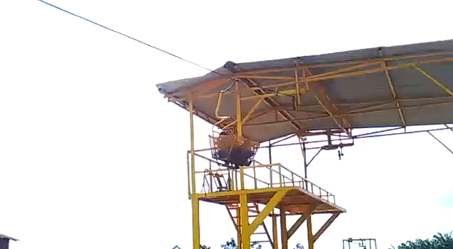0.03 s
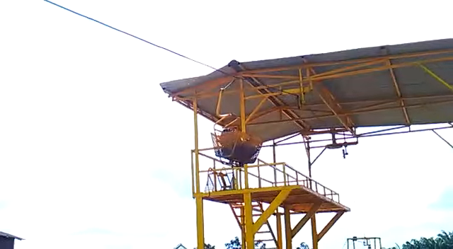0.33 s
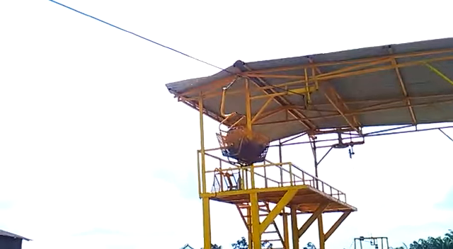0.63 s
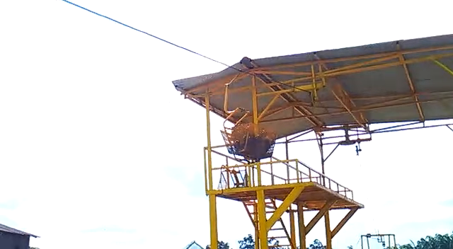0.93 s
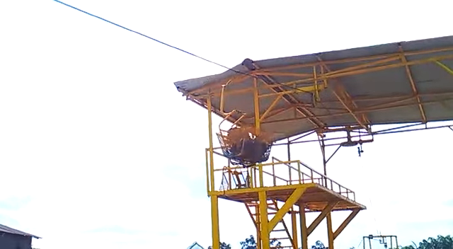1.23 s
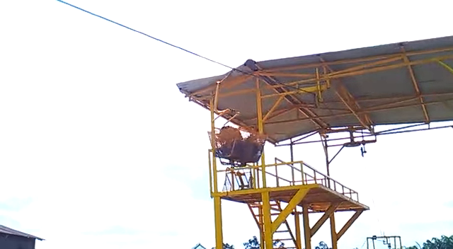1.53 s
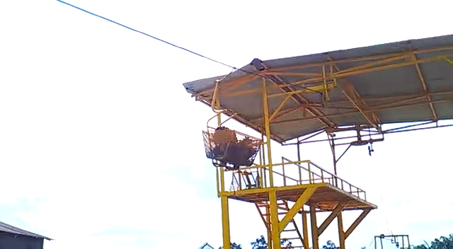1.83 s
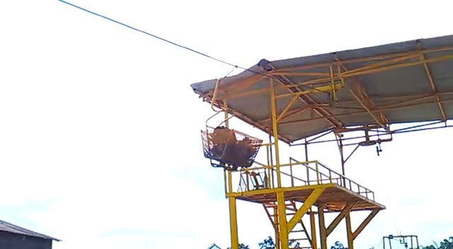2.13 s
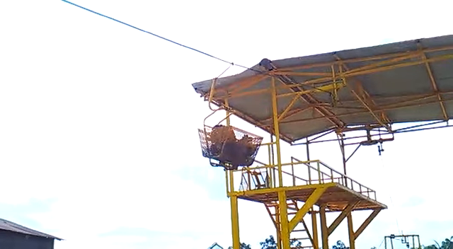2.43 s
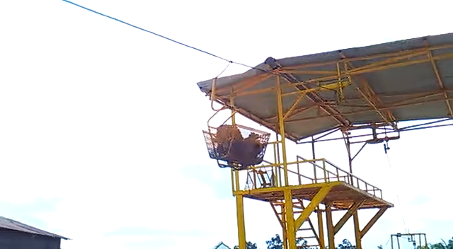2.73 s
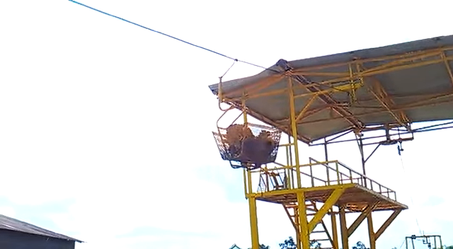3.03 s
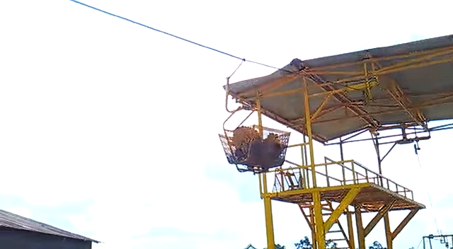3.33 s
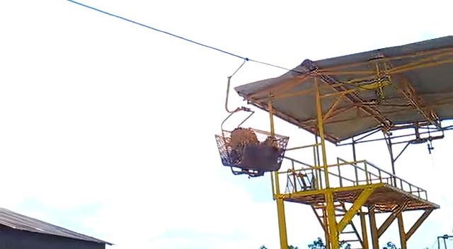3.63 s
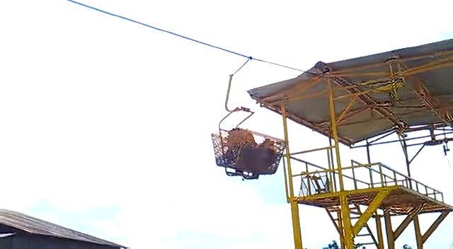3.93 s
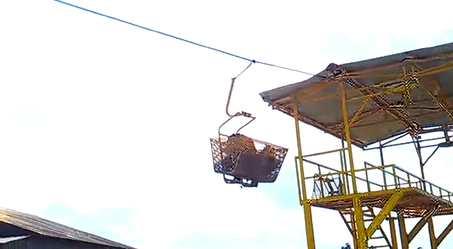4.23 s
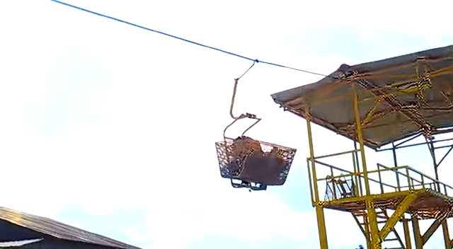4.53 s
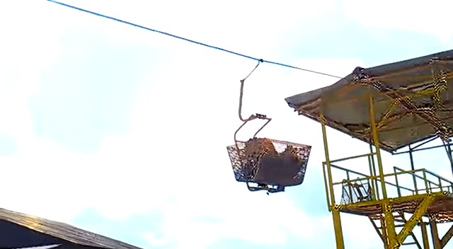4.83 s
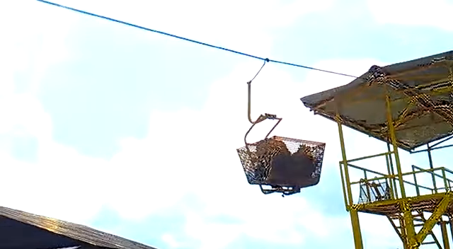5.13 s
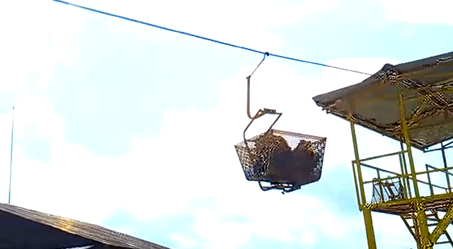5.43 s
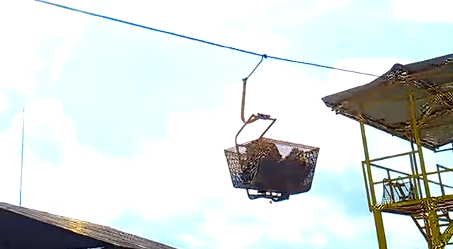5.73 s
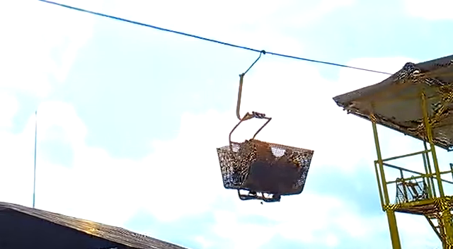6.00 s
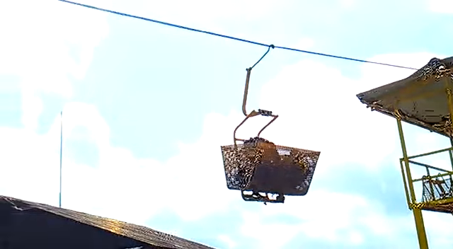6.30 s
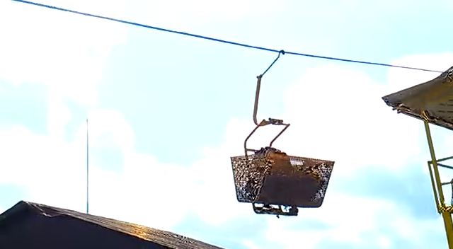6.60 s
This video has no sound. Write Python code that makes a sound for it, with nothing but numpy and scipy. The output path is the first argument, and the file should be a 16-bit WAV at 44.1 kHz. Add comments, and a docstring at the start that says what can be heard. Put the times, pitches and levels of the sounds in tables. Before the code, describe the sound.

A diesel engine drones and clatters at a goods cableway while the cable rumbles and squeaks over pulleys and cicadas shrill.

```python
"""Close beside the tin-roofed station of a goods cableway, the microphone turning after a loaded basket.
The sound cuts in at 0.6 s: a diesel drive at steady speed drones, knocks and clatters straight ahead,
the rope rumbles, rasps and squeaks over the sheaves, and cicadas shrill in the open country around.
The steel frame thuds now and then, and fainter insects call. From about 3 s a loose plate rings in
bouts and a few puffs of wind bump the microphone."""
import sys
import numpy as np
from scipy import signal
from scipy.fft import rfft, irfft, next_fast_len
from scipy.io import wavfile

SR = 44100
rng = np.random.default_rng(int(sys.argv[2]) if len(sys.argv) > 2 else 0)


def generate_wav(signal):
    """Clip the signal to [-1, 1] and save it as 16-bit WAV at the path in sys.argv[1]."""
    frames = np.transpose(np.atleast_2d(signal))
    scaled = np.clip(frames, -1, 1) * 32767
    pcm = np.round(scaled).astype(np.int16)
    wavfile.write(sys.argv[1], SR, pcm)


N = 302526
TIME = np.arange(N) / SR
CYCLES_PER_S = 12.581   # four-stroke cycles of the governed engine

# the four uneven exhaust beats: place_in_cycle (0-1), relative_db
EXHAUST_BEATS = [(.072, 6), (0.36, -4.5), (0.58, -0.5), (.872, -1.5)]
# rise and fall of the exhaust: time_s, gain_db
EXHAUST_LEVEL = [(.6, -4), (1.3, -0.5), (1.85, -2.5), (2.2, -6.5), (2.7, 1), (3.3, -3.5), (4.4, -1),
                 (4.9, -5.5), (5.5, -1), (6.85, 0.5)]


def from_db(db):
    """Decibels to gain."""
    return 10 ** (np.asarray(db) / 20)


def rms_one(x):
    """Scale to unit power."""
    return x / np.sqrt(np.mean(x ** 2) + 1e-20)


def in_time(curve):
    """A curve of (time_s, value) points, read at every sample."""
    return np.interp(TIME, *np.transpose(curve))


def drift(rate_hz):
    """Smooth random wander of spread about 1, changing some rate_hz times a second."""
    wander = signal.resample_poly(rng.standard_normal(1024), 16, 1)
    return np.interp((TIME + 1) * rate_hz * 16, np.arange(len(wander)), wander)


def swell(centre_s, width_s):
    """A bell-shaped rise and fall."""
    return np.exp(-2 * ((TIME - centre_s) / width_s) ** 2)


def bout(start_s, end_s, edge_s=.065):
    """Set in, hold, die away."""
    begun, ended = (.5 + .5 * np.tanh(2 * (TIME - s) / edge_s) for s in (start_s, end_s))
    return begun * (1 - ended)


def as_turned(first_db, turned_db):
    """Gain gliding between two levels as the microphone turns to follow the basket."""
    # the microphone's swing: time_s, share_turned (0-1)
    turn = [(.6, 0.17), (1.6, 0.41), (2.3, 0.54), (3.7, 0.46), (4.4, 0.82), (5.7, 0.98), (6.85, 1)]
    return from_db(first_db + (turned_db - first_db) * in_time(turn))


def colour(x, spectrum):
    """Filter by a (frequency_hz, relative_db) curve that falls away past its ends; rms 1."""
    size = next_fast_len(N)
    bins_hz = np.fft.rfftfreq(size, 1 / SR) + 1e-3
    hz, db = np.transpose(spectrum)
    roll_off = 1 / np.sqrt(1 + (hz[0] / bins_hz) ** 8 + (bins_hz / hz[-1]) ** 16)
    gain = from_db(np.interp(np.log(bins_hz), np.log(hz), db))
    return rms_one(irfft(rfft(x, size) * roll_off * gain, size)[..., :N])


def patchy_noise(depth_db, rate_hz, groups=6, strip_hz=110):
    """Noise whose interleaved frequency strips swell and fade apart, as when contacts wake different modes."""
    size = next_fast_len(N)
    white = rfft(rng.standard_normal(size))
    group = (np.fft.rfftfreq(size, 1 / SR) // strip_hz) % groups
    strips = (irfft(white * (group == k), size)[:N] for k in range(groups))
    return sum(strip * from_db(depth_db * drift(rate_hz)) for strip in strips)


def drone(cycle, waver_db=1.7, pipe_phase_rad=1.09):
    """The exhaust beats set the phases of the harmonics; the silencer sets their strength."""
    # exhaust harmonics: multiple_of_cycle_rate, first_db, turned_db
    harmonics = [(3, -56.5, -66.5), (6, -55.5, -58.5), (10, -61, -65), (11, -77, -76), (12, -59, -58),
                 (13, -63.5, -57), (14, -70.5, -62), (15, -71.5, -60.5), (16, -57, -51.5), (17, -79, -78.5),
                 (18, -65, -71.5), (20, -62.5, -69), (23, -67, -78), (24, -60.5, -57.5), (26, -68.5, -68),
                 (28, -67.5, -68.5), (35, -65, -60.5), (44, -71, -63)]
    out = 0
    for order, first_db, turned_db in harmonics:
        order = round(order)
        beats = sum(from_db(db) * np.exp(-2j * np.pi * order * place) for place, db in EXHAUST_BEATS)
        gain = as_turned(first_db, turned_db) * from_db(waver_db * drift(7))
        if order == 6:   # this deep harmonic booms for a while
            gain = gain + from_db(-58) * bout(1.07, 2.1)
        out = out + gain * np.cos(2 * np.pi * order * cycle + np.angle(beats) + pipe_phase_rad)
    return np.sqrt(2) * out


def putts(cycle, repeat_share=.2, pattern_size=3500):
    """Each beat puffs out rough gas, partly the same in every cycle, partly new."""
    # gas noise: frequency_hz, relative_db
    putt_spectrum = [(90, 1.5), (150, 3), (210, 7.5), (255, 2.5), (310, 14), (380, -24), (600, -33)]
    puffing = sum(from_db(db) * np.exp(-((cycle - place + .03) % 1) / .07) for place, db in EXHAUST_BEATS)
    position = (cycle % 1 * pattern_size).astype(int) % pattern_size
    repeated = np.sqrt(repeat_share) * rng.standard_normal(pattern_size)[position]
    fresh = np.sqrt(1 - repeat_share) * rng.standard_normal(N)
    return from_db(-60) * colour(puffing * (repeated + fresh), putt_spectrum)


def exhaust(cycle):
    """Drone and gas together; no two beats are equally strong."""
    # the engine fires extra hard: centre_s, lift_db
    hard_beats = [(3.085, 2.5), (3.325, 4), (3.96, 3), (4.28, 3), (5.548, 2.5), (5.945, 4), (6.108, 2.5),
                  (6.425, 2), (6.742, 1.5)]
    effort_db = sum(db * swell(s, width_s=.014) for s, db in hard_beats)
    gas = putts(cycle)
    gain = from_db(in_time(EXHAUST_LEVEL) + effort_db + 1.2 * drift(22))
    return gain * (drone(cycle) + gas)


def strikes(cycle, contacts, uneven_db, scatter_s, detune):
    """Contacts ring once a cycle, never twice alike; returns the rings and their force (rms 1)."""
    rings = force = 0
    for place, hz, ring_s, db in contacts:
        count, since_strike = np.divmod(cycle - place, 1)
        count = (count - count[0]).astype(int)
        strength, late, sharp = rng.standard_normal((count[-1] + 1, 3))[count].T
        age_s = since_strike / CYCLES_PER_S
        envelope = from_db(db + uneven_db * strength) * age_s / ring_s * np.exp(1 - age_s / ring_s)
        pitch_hz = hz * (1 + detune * sharp)
        rings = rings + envelope * np.sin(2 * np.pi * pitch_hz * (age_s - scatter_s * late))
        force = force + envelope
    return rings, rms_one(force)


def ringing(cycle, order, wobble_rad, waver_db):
    """A metal tone at a multiple of the cycle rate, wavering in strength and phase."""
    gain = np.sqrt(2) * from_db(waver_db * drift(13))
    return gain * np.sin(2 * np.pi * order * cycle + wobble_rad * drift(15))


def block_knocks(cycle, grit):
    """Injectors and valves knock on the block, with a rough rattle, and keep the casing ringing."""
    # knocks: place_in_cycle (0-1), pitch_hz, ring_s, relative_db
    contacts = [(.07, 906, .005, -50), (.214, 898, .0026, -42.5), (.42, 900, .003, -46.5),
                (.534, 823, .0027, -46.5), (.56, 960, .0025, -48), (.645, 938, .002, -50.5),
                (.862, 912, .002, -51.5)]
    # casing resonances: multiple_of_cycle_rate, relative_db
    casing_modes = [(61, -64), (65, -64), (68, -57), (76, -60), (80, -59)]
    # rattle: frequency_hz, relative_db
    rattle_spectrum = [(400, -2), (650, -12), (800, -7), (900, 9.5), (1020, -3), (1090, 15), (1180, -30),
                       (2000, -44)]
    # rise and fall of all three: time_s, gain_db
    block_level = [(.6, -16), (.95, -13.5), (1.05, -8), (1.4, -12), (2.1, -6), (2.45, -3), (2.9, -4),
                   (3.45, -8), (3.77, -1.5), (3.93, -17), (4.14, -3), (4.49, 2.5), (4.75, -6.5), (5, -3.5),
                   (5.6, 1), (6.85, 0)]
    knocks, force = strikes(cycle, contacts, uneven_db=1.5, scatter_s=1.5e-4, detune=.008)
    casing = sum(from_db(db) * ringing(cycle, k, wobble_rad=.55, waver_db=2) for k, db in casing_modes)
    rattle = from_db(-59) * colour(force * grit, rattle_spectrum)
    return from_db(in_time(block_level)) * (knocks + casing + rattle)


def loose_plate(cycle, decay_s=.005):
    """A loose plate slaps, louder in bouts; its own tone near 1.1 kHz lingers after each slap."""
    # slaps: place_in_cycle (0-1), pitch_hz, ring_s, relative_db
    contacts = [(.964, 1085, .0036, -45), (.06, 1115, .004, -56), (.24, 1000, .004, -48.5),
                (.33, 1145, .0045, -53), (.43, 1010, .0035, -50.5), (.56, 1082, .003, -57)]
    # loud bouts: start_s, end_s, gain_db
    loud_bouts = [(3.14, 3.37, 2), (3.45, 3.85, -1.5), (4.02, 4.52, 2), (4.98, 6.9, 1)]
    slaps, force = strikes(cycle, contacts, uneven_db=1.9, scatter_s=3e-4, detune=.012)
    lingering = rms_one(signal.lfilter([1], [1, -np.exp(-1 / (decay_s * SR))], force))
    tone = from_db(-54) * lingering * ringing(cycle, order=87, wobble_rad=.3, waver_db=1)
    idle_gain = as_turned(-21.5, -4.5)
    bout_gains = [from_db(db) * bout(start_s, end_s) for start_s, end_s, db in loud_bouts]
    return (slaps + tone) * np.max([idle_gain] + bout_gains, axis=0)


def clatter(cycle, grit):
    """Small loose parts clink, each with a burst of rough noise."""
    # clinks: place_in_cycle (0-1), pitch_hz, ring_s, relative_db
    contacts = [(.951, 1297, .0025, -48.5), (.03, 1266, .004, -53.5), (.035, 2391, .004, -61),
                (.085, 1830, .004, -55), (.19, 2038, .004, -57.5), (.274, 1467, .003, -55),
                (.3, 1830, .004, -56.5), (.423, 1487, .0045, -54), (.49, 2620, .004, -61.5),
                (.5, 1950, .005, -55), (.66, 1300, .005, -59.5), (.72, 1620, .005, -57.5)]
    # noise bursts: frequency_hz, relative_db
    burst_spectrum = [(900, -16), (1080, -6), (1170, 2), (1270, 7.5), (1480, 6), (1700, -5.5), (2100, -21),
                      (3000, -26.5), (5000, -24.5)]
    # rise and fall of both: time_s, gain_db
    clatter_level = [(.6, -6.5), (1.1, -10.5), (1.3, -7.5), (3, -8), (3.1, -2), (3.8, 1.5), (4, -0.5),
                     (4.6, 1.5), (5.5, -0.5), (6.2, -1), (6.85, 0)]
    clinks, force = strikes(cycle, contacts, uneven_db=3, scatter_s=2e-4, detune=.025)
    bursts = from_db(-61.5) * colour(force * grit, burst_spectrum)
    return from_db(in_time(clatter_level)) * (clinks + bursts)


def under_roof(x, decay_s=.12, echo_db=-8.5):
    """The direct sound and a short, diffuse tail from the tin roof."""
    age_s = TIME[:SR // 3]
    envelope = from_db(-60 * age_s / decay_s) * (1 - np.exp(-age_s / .006))
    tail = rng.standard_normal(len(age_s)) * envelope
    return x + from_db(echo_db) * signal.fftconvolve(x, tail / np.linalg.norm(tail))[:N]


def fan(grit):
    """The fan's hiss grows as the microphone turns, and surges once."""
    # hiss: frequency_hz, relative_db
    hiss_spectrum = [(2200, -35), (3000, 12), (3500, 2), (3800, 0.5), (4200, -1.5), (5000, -9.5),
                     (7000, -4.5), (14000, -37)]
    surge = from_db(-65.5) * swell(5.25, .53)
    return np.hypot(as_turned(-81, -67.5), surge) * colour(grit, hiss_spectrum)


def engine(cycle):
    """The diesel drive: knocks, loose metal and exhaust in step with one shaft, plus the fan."""
    grit = patchy_noise(depth_db=4, rate_hz=22)
    metal = block_knocks(cycle, grit) + loose_plate(cycle)
    loose_parts = clatter(cycle, grit)
    return metal + exhaust(cycle) + under_roof(loose_parts) + fan(grit)


def chug(cycle, depth_db, place):
    """The gain swings as the whole block rocks once a cycle; rms 1."""
    return rms_one(from_db(depth_db * np.cos(2 * np.pi * (cycle - place))))


def rope(cycle):
    """Rope rolls over the sheaves: the frame rumbles, strands rasp in the grooves, a bearing whines."""
    # frame rumble, strand rasp and its brighter band: frequency_hz, relative_db
    rumble_spectrum = [(20, -28), (40, 1.5), (75, -5.5), (100, -6), (200, -8), (255, -7.5), (360, -3),
                       (440, 3), (550, -0.5), (700, -3), (800, -4), (1080, -12), (1200, -17), (3000, -39)]
    rasp_spectrum = [(1300, -27), (1600, -13), (1720, 1), (1830, 5), (1920, -1.5), (2010, 4.5), (2150, -13),
                     (2600, -65)]
    bright_spectrum = [(1800, -29), (2200, 7.5), (2450, 7.5), (2750, 2), (3000, -4), (3400, -39),
                       (4200, -55)]
    # rise and fall of the rumble and the bright band: time_s, level_db
    rumble_level = [(.6, -57), (.88, -60), (1.05, -53.5), (1.95, -50), (2.9, -50), (3.3, -56), (3.7, -49.5),
                    (3.95, -51), (4.2, -49.5), (6.85, -50.5)]
    bright_level = [(.6, -66), (.8, -64.5), (1.1, -64.5), (1.45, -59.5), (1.9, -61), (2.1, -61), (5.2, -66),
                    (5.9, -70), (6.85, -65)]
    # the rope bites harder into a groove: centre_s, width_s, level_db
    scrapes = [(0.787, 0.22, -57), (2.35, 0.28, -57.5), (2.809, 0.064, -54.5), (3.149, 0.12, -60),
               (3.473, 0.29, -55), (3.756, 0.1, -53), (4.401, 0.089, -61), (4.777, 0.3, -57.5),
               (5.237, .045, -54), (5.48, 0.13, -55), (6.208, 0.13, -56)]
    bite = sum(from_db(db) * swell(s, width_s) for s, width_s, db in scrapes)
    jog = chug(cycle, depth_db=1.6, place=.4)
    grinding = patchy_noise(depth_db=2.6, rate_hz=30) * chug(cycle, depth_db=1.9, place=.58)
    scraping = patchy_noise(depth_db=4.6, rate_hz=36) * jog
    rumble = from_db(in_time(rumble_level)) * colour(grinding, rumble_spectrum)
    rasp = np.hypot(from_db(-63.5), bite) * colour(scraping, rasp_spectrum)
    bright_gain = np.hypot(from_db(in_time(bright_level)), from_db(-15) * bite)
    bright = bright_gain * colour(scraping, bright_spectrum)
    bearing = as_turned(-63.5, -75.5) * jog * ringing(cycle, order=117, wobble_rad=2.9, waver_db=2)
    return rumble + rasp + bright + bearing


def spread(mid, side, side_db):
    """Left and right from a mid and a side signal."""
    return mid + from_db(side_db) * side * [[1], [-1]]


def cicadas(flutter_db=.5):
    """Many cicadas blur into one shrill, shimmering band, slightly spread in stereo."""
    # shrill band: frequency_hz, relative_db
    chorus_spectrum = [(3800, -49), (5000, -23.5), (6700, -19.5), (7200, -14.5), (7550, -5.5), (7800, 1),
                       (8150, 0.5), (8500, -6), (8900, -15), (9500, -21.5), (12000, -28), (13000, -31),
                       (14300, -35)]
    # its rise and fall: time_s, level_db
    chorus_level = [(.6, -54), (.92, -53.5), (1, -58), (1.15, -62.5), (1.35, -61), (1.46, -72.5),
                    (1.52, -54), (1.68, -59), (2.0, -53.5), (4.1, -58.5), (5.3, -62), (5.62, -57.5),
                    (6.85, -59)]
    # the level dips briefly: centre_s, width_s, gain_db
    dips = [(3.17, 0.018, -3), (4.382, 0.039, -3), (4.607, 0.028, -7), (5.94, .03, -6), (6.145, 0.021, -3)]
    mid = colour(patchy_noise(depth_db=3, rate_hz=45), chorus_spectrum)
    side = colour(rng.standard_normal(N), chorus_spectrum)
    dips_db = sum(db * swell(s, width_s) for s, width_s, db in dips)
    gain = from_db(in_time(chorus_level) + dips_db + flutter_db * drift(70))
    return gain * spread(mid, side, side_db=-25.5)


def chirr(pitch_hz, flutter_db):
    """A single insect's dry, fluttering band."""
    # band shape: multiple_of_pitch, relative_db
    band_shape = [(.75, -28), (.92, -8.5), (1, 1.5), (1.07, -6.5), (1.3, -23.5)]
    spectrum = [(multiple * pitch_hz, db) for multiple, db in band_shape]
    return from_db(flutter_db * drift(30)) * colour(rng.standard_normal(N), spectrum)


def air():
    """The faint, wide hiss of the open country."""
    # hiss: frequency_hz, relative_db
    air_spectrum = [(3000, -29), (4100, -24), (5100, -18), (5700, 7), (6300, -1), (9000, 7), (12200, 5.5),
                    (13000, 2.5), (14300, -5)]
    mid, side = colour(rng.standard_normal((2, N)), air_spectrum)
    return as_turned(-80.5, -79.5) * spread(mid, side, side_db=-.5)


def squeaks(relative_bandwidth=.065):
    """Brief, rough rings where metal rubs on metal in the running gear."""
    # rubs: centre_s, width_s, pitch_hz, level_db
    rubs = [(0.793, 0.021, 1810, -49), (.82, 0.017, 1487, -50.5), (0.879, 0.025, 1995, -49),
            (1.21, 0.012, 3500, -72), (1.55, .35, 2340, -63), (1.88, .016, 2390, -55), (2, 0.079, 528, -47),
            (2.795, 0.021, 4720, -67), (3.422, 0.034, 5500, -73), (3.477, 0.023, 1740, -48.5),
            (3.52, .03, 4580, -70), (3.627, 0.04, 5300, -66.5), (4.235, 0.027, 1557, -46.5),
            (4.69, .025, 5530, -67), (5.34, 0.017, 4680, -68), (5.675, .03, 4330, -71),
            (5.893, .03, 4420, -69), (5.938, .02, 1360, -49), (5.95, 0.017, 4020, -69),
            (6.062, .015, 4770, -68), (6.163, 0.025, 4420, -66), (6.2, 0.022, 2085, -55),
            (6.407, 0.035, 4600, -70), (6.76, 0.012, 5430, -64)]
    out = np.zeros(N)
    for centre_s, width_s, hz, db in rubs:
        near = abs(TIME - centre_s) < 3 * width_s
        radius = np.exp(-np.pi * relative_bandwidth * hz / SR)
        resonator = [1, -2 * radius * np.cos(2 * np.pi * hz / SR), radius ** 2]
        friction = rng.standard_normal(near.sum() + SR // 10)   # extra lead-in lets the ring build up
        ring = signal.lfilter([1], resonator, signal.lfilter([1], resonator, friction))
        out[near] += from_db(db) * swell(centre_s, width_s)[near] * rms_one(ring[-near.sum():])
    return out


def bumps(events, wander_rad):
    """Each bump is a short burst of uneven low swings."""
    sway = wander_rad * drift(90)
    return np.sqrt(2) * sum(from_db(db) * swell(s, width_s) * np.sin(2 * np.pi * hz * (TIME - s) + sway)
                            for s, width_s, hz, db in events)


def frame_thuds():
    """Dull thuds in the steel frame."""
    # thuds: centre_s, width_s, pitch_hz, level_db
    thuds = [(1.05, 0.036, 680, -56), (2.04, .025, 152, -47.5), (3.84, 0.012, 292, -45),
             (6.225, .015, 280, -46), (6.775, 0.017, 430, -44)]
    return bumps(thuds, wander_rad=.4)


def insect_calls():
    """Thin calls of fainter insects swell and fade."""
    # calls: centre_s, width_s, pitch_hz, level_db
    calls = [(1.58, .5, 4400, -74), (2.87, .15, 4470, -76), (3.25, 0.35, 5250, -76),
             (3.85, 0.17, 5300, -71), (4.25, 0.35, 5600, -75), (4.68, 0.34, 5550, -71),
             (5.15, 0.33, 5000, -75), (5.5, 0.43, 5550, -76), (6.35, 0.66, 4290, -74),
             (6.5, 0.54, 5730, -74)]
    return sum(from_db(db) * swell(s, width_s) * chirr(hz, flutter_db=3) for s, width_s, hz, db in calls)


def wind():
    """Puffs of wind bump the microphone."""
    # puffs: centre_s, width_s, pitch_hz, level_db
    puffs = [(3.051, 0.014, 77.7, -40), (3.094, .014, 75, -43), (3.135, 0.017, 70, -41.5),
             (3.298, 0.022, 129.4, -43), (3.412, 0.024, 111.4, -35), (3.423, 0.027, 55.4, -38),
             (3.531, 0.055, 63, -46.5), (3.861, 0.014, 69, -41), (4.105, 0.032, 69.2, -35),
             (4.225, 0.068, 55, -51), (5.611, 0.04, 123, -46), (5.671, 0.022, 73.6, -34.5),
             (5.68, 0.039, 136, -44), (5.75, .12, 49.7, -51), (5.879, 0.021, 113, -44),
             (6.635, 0.024, 75, -44.5)]
    return bumps(puffs, wander_rad=.55)


def scene():
    """The station stands straight ahead; only the cicadas and the air have stereo width."""
    cycle = CYCLES_PER_S * (TIME - 5.542)   # engine cycles, counted from one that begins at 5.542 s
    station = engine(cycle) + rope(cycle) + squeaks() + frame_thuds()
    lone_insects = insect_calls() + from_db(-83) * chirr(4580, flutter_db=2.5)   # one never stops
    return station + lone_insects + cicadas() + wind() + air()


def record(dry, start_s=.593, cutoff_hz=14250):
    """The sound cuts in abruptly; the top treble is cut off."""
    low_pass = signal.firwin(401, cutoff_hz, fs=SR)
    return signal.fftconvolve(dry * (TIME >= start_s), low_pass[None], "same", axes=1)


dry = scene()
out = record(dry)
generate_wav(out)
```